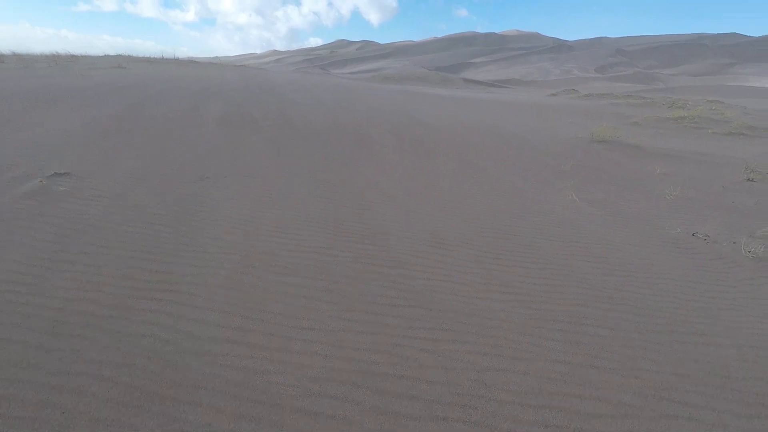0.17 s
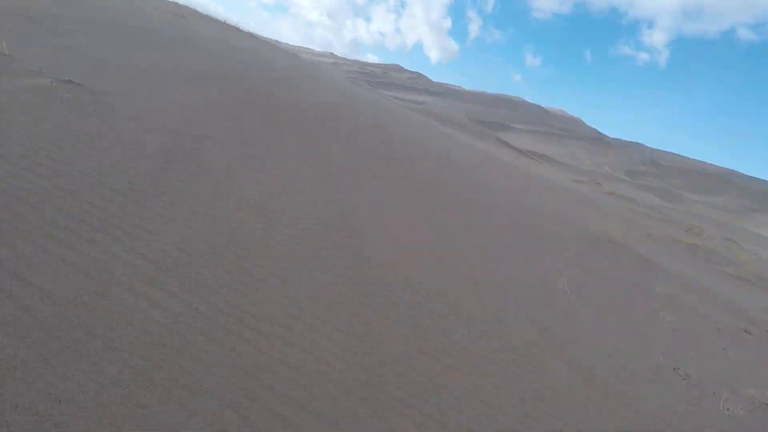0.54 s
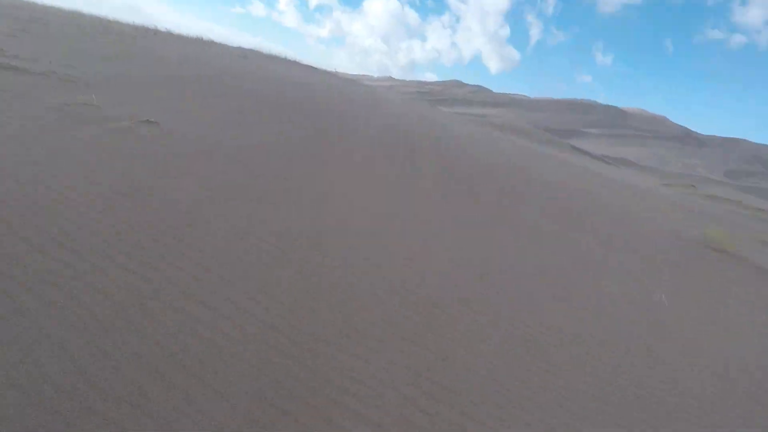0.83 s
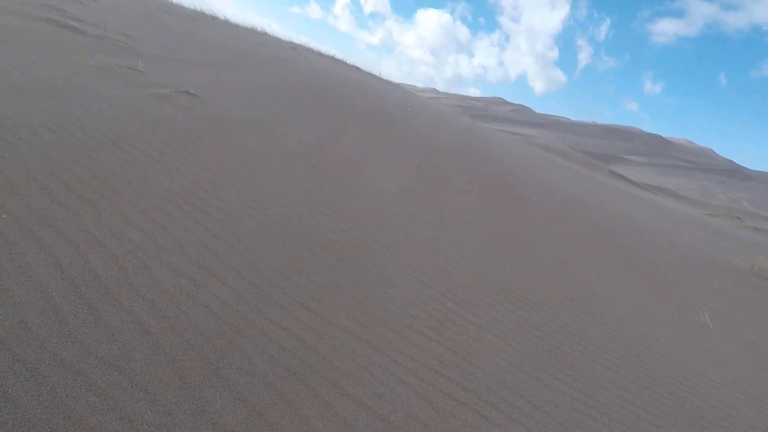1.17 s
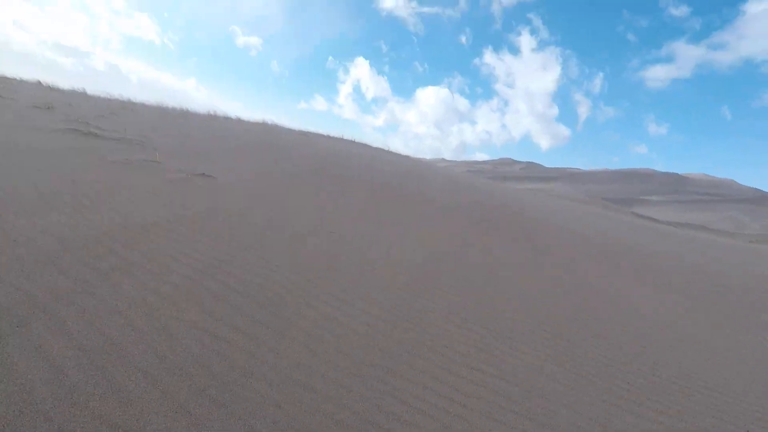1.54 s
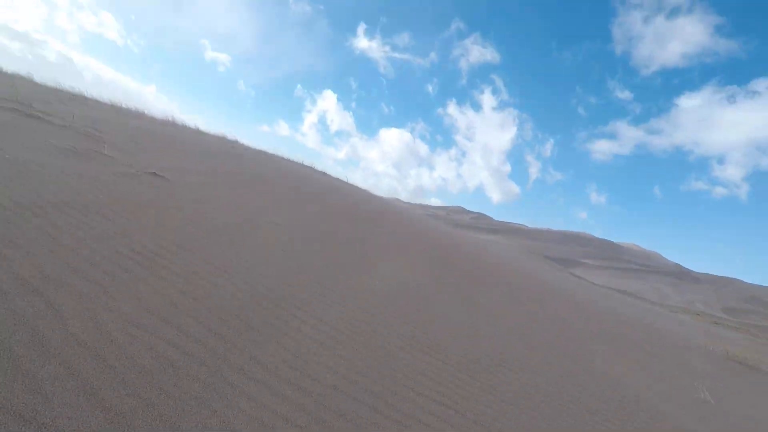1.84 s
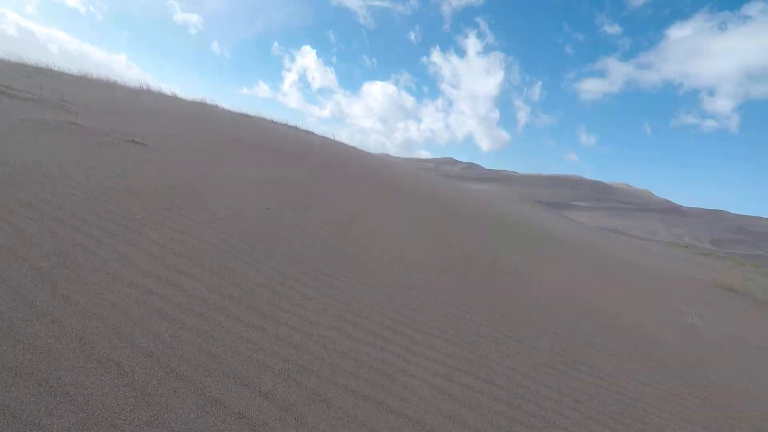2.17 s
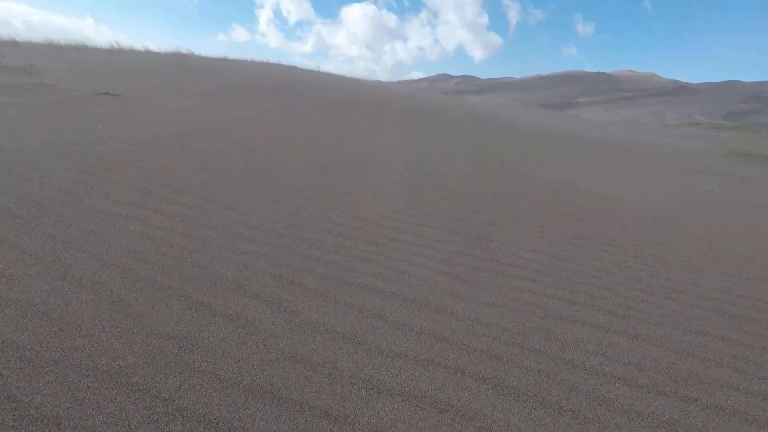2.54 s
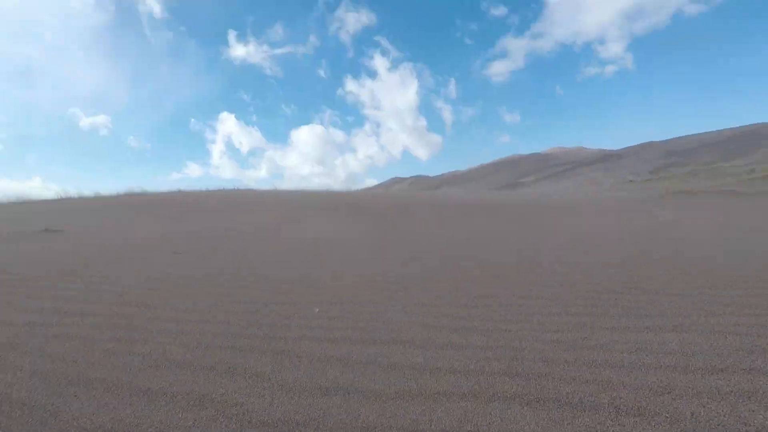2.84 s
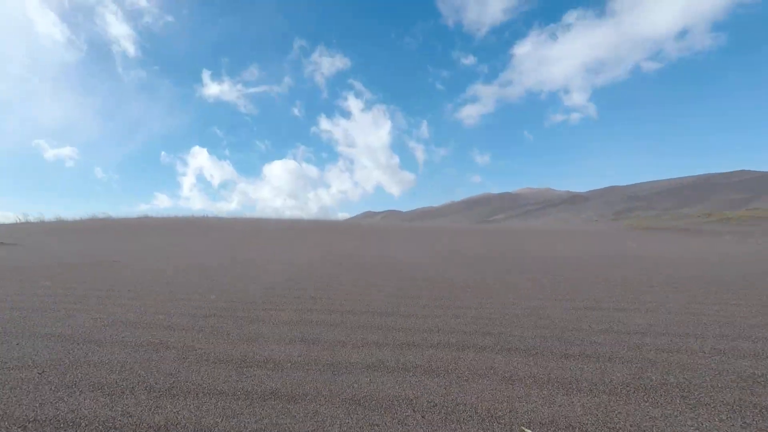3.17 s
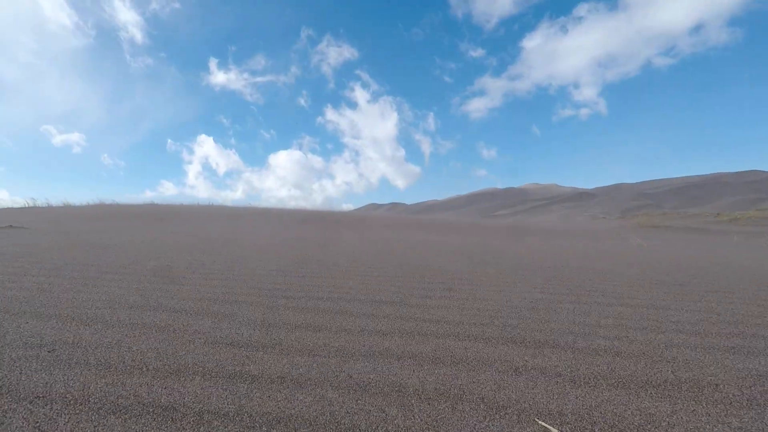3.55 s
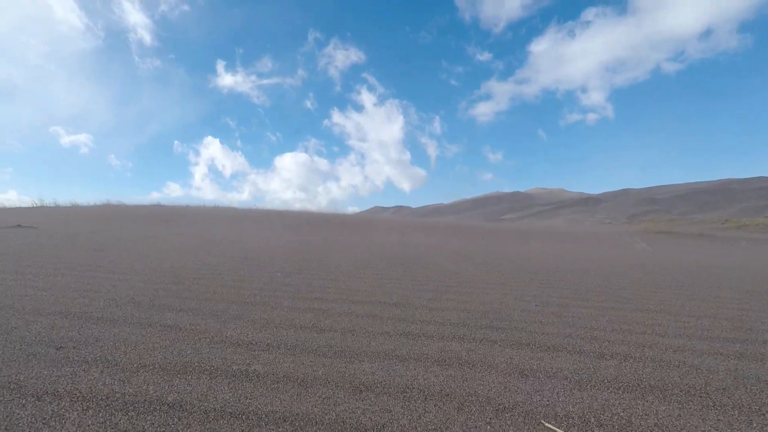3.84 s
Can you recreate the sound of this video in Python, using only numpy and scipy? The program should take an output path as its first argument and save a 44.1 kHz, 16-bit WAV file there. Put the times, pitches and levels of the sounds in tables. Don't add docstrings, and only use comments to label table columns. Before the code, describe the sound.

Gusty wind thumps and rumbles against a small camera microphone, swelling from near silence to a roar.

```python
import sys
import numpy as np
from scipy import signal
from scipy.io import wavfile
from scipy.ndimage import uniform_filter1d

SR = 44100
rng = np.random.default_rng(int(sys.argv[2]) if len(sys.argv) > 2 else 0)


def master_out(mix):
    frames = np.transpose(np.atleast_2d(mix))
    ceiling = np.clip(frames, -1, 1)
    pcm = np.round(ceiling * 32767).astype(np.int16)
    wavfile.write(sys.argv[1], SR, pcm)


def magnitude_from_level(level_db):
    exponent = np.asarray(level_db, float) / 20
    return 10 ** exponent


N = 176400

# start_s, length_s, level_db, pitch_hz
EDDIES = [(0.374, 0.029, -43.5, 66), (0.462, 0.06, -48.5, 166), (0.63, 0.03, -50.5, 69),
          (0.737, 0.02, -53, 88), (0.882, 0.0064, -33, 123), (0.915, .015, -42.5, 58.4),
          (2.388, 0.0097, -18.5, 281), (1.031, 0.013, -49, 92), (1.195, 0.0032, -39, 122),
          (1.239, 0.0061, -22.5, 186), (1.265, 0.0027, -13.5, 152), (1.351, 0.029, -24.5, 81.4),
          (1.376, 0.022, -21.5, 142), (1.413, 0.03, -31, 90), (1.457, 0.018, -18, 98),
          (1.538, 0.076, -30, 129), (1.741, 0.033, -24.5, 122), (1.781, 0.013, -15.5, 97),
          (1.852, 0.034, -15, 72.4), (1.927, 0.037, -15.5, 128.5), (2.052, 0.042, -24.5, 101),
          (2.119, 0.05, -20.5, 83), (2.391, 0.037, -13.5, 52.4), (2.506, 0.022, -19.5, 149),
          (2.566, 0.046, -16.5, 127), (2.608, 0.055, -15, 103), (2.669, 0.0113, -9.5, 85.6),
          (3.062, 0.018, -13.5, 82.4), (3.065, 0.0092, -17, 275), (3.078, 0.026, -18.5, 102.5),
          (3.12, 0.15, -34, 131), (2.683, 0.023, -30.5, 133), (2.783, .2, -41.5, 110),
          (3.119, 0.033, -30, 290), (3.248, 0.05, -32, 261), (2.184, 0.092, -41, 290),
          (2.334, 0.13, -43, 302), (1.58, 0.076, -45, 310), (3.634, 0.047, -34.5, 108),
          (3.704, 0.0062, -15.5, 119), (3.83, 0.18, -23.5, 132)]
# start_s, peak_db
EDDY_SNAPS = [
    (1.243, -15),
    (1.268, -11),
    (1.383, -14.5),
    (1.933, -24),
    (2.147, -28),
    (2.402, -5.5),
    (2.647, -22),
    (2.669, -16.5),
    (3.056, -6.5),
    (3.709, -32),
]
# start_s, length_s, level_db, edge_tone_hz
AIR_BURSTS = [(0.454, 0.047, -58, 485), (0.442, .095, -64.5, 4150), (0.772, 0.005, -60, 800),
              (0.874, 0.0053, -41, 950), (0.995, 0.095, -63.5, 1720), (1.107, 0.21, -59, 1670),
              (1.202, 0.0051, -57, 1600), (1.24, 0.0042, -28.5, 1600), (1.265, 0.009, -28.5, 770),
              (1.317, 0.071, -46, 1100), (1.379, 0.0068, -31, 1320), (1.389, 0.047, -45.5, 780),
              (1.458, 0.0056, -38.5, 800), (1.57, 0.0096, -42, 760), (1.544, 0.26, -54, 830),
              (1.852, 0.025, -37, 850), (1.887, .012, -34.5, 1600), (1.909, 0.016, -38, 1200),
              (1.932, 0.024, -26.5, 853), (2.045, 0.05, -34.5, 910), (2.057, 0.0083, -31, 1010),
              (2.142, 0.034, -32.5, 1005), (2.243, 0.018, -43, 4440), (2.186, 0.078, -32.5, 904),
              (2.308, 0.05, -41, 840), (2.394, 0.017, -31.5, 1590), (2.43, 0.0091, -38.5, 1600),
              (2.505, 0.027, -29.5, 1010), (2.563, 0.068, -42, 1860), (2.584, 0.051, -28, 1020),
              (2.642, 0.012, -22.5, 1570), (2.664, 0.011, -23, 950), (3.052, 0.022, -15, 1315),
              (3.076, 0.011, -13, 1590), (3.097, 0.0055, -17, 1560), (3.265, 0.0037, -23, 1170),
              (3.276, 0.0034, -20, 1100), (3.406, 0.0041, -27, 1250), (3.081, 0.21, -25, 1193),
              (3.091, .2, -26, 1574), (1.242, .006, -43, 2920), (1.266, 0.0045, -44.5, 2600),
              (3.348, 0.13, -37, 1080), (3.704, 0.0038, -18.5, 1400), (3.773, 0.41, -26, 1370),
              (3.825, 0.17, -27, 1580), (3.889, 0.078, -18, 1170)]
# time_s, level_db
AIR_STREAM = [(.09, -67), (.3, -66.5), (.55, -62), (.85, -61), (.96, -66.5), (1.15, -66), (1.3, -50.5),
              (1.5, -50.5), (1.75, -42), (1.83, -55), (2.0, -43), (2.29, -45.5), (2.6, -35.5), (2.71, -52),
              (3.0, -45.5), (3.35, -46), (3.6, -41.5), (4, -25.5)]
# time_s, depth_db
AIR_LULLS = [
    (.145, -7),
    (.32, -9),
    (.415, -7.5),
    (.725, -12),
    (1.51, -4.5),
    (2.015, -7),
    (2.115, -3),
    (2.29, -9),
    (2.469, -5.5),
]
# pitch_hz, width_hz, level_db
HOUSING_RINGS = [(550, 633, -6.5), (800, 410, -0.5), (1100, 110, -0.5), (1482, 270, -5), (1972, 252, -6),
                 (2533, 175, -7), (3517, 287, -14), (4530, 620, -17), (5845, 554, -17.5), (6860, 640, -30),
                 (8600, 1000, -34.5), (11000, 4500, -51)]
# time_s, level_db, grains_per_s
SAND_STREAM = [(0, -125, 6000), (1.2, -108, 5400), (1.7, -77.5, 3900), (2.5, -67, 3000), (2.74, -63.5, 550),
               (2.8, -60, 580), (2.93, -65, 980), (2.97, -54, 3400), (3.3, -51, 3200), (3.6, -53, 970),
               (4, -59, 7200)]
# time_s, peak_db
COARSE_GRAINS = [(1.002, -53), (1.135, -56), (1.1737, -50), (1.1894, -63), (1.2023, -58), (1.2113, -56),
                 (1.5585, -60), (1.8035, -61), (1.8603, -41), (2.1567, -42), (2.235, -45), (2.2474, -29),
                 (2.3854, -35), (2.63, -36), (2.6889, -38), (2.7591, -35), (2.7826, -32.5), (2.7864, -56),
                 (2.7984, -58), (2.804, -29), (2.8165, -38), (2.8516, -34), (2.8804, -27.5), (2.9364, -38),
                 (2.9663, -33), (3.2053, -26), (3.2332, -28), (3.4662, -38), (3.5041, -47), (3.6368, -38),
                 (3.6642, -29), (3.6907, -32), (3.7081, -20), (3.745, -26.5), (3.7889, -23)]
# pitch_hz, width_hz, level_db
CASE_RINGS = [
    (1600, 230, 8),
    (2510, 190, 7),
    (3500, 780, 1.5),
    (4505, 230, 8.5),
    (5660, 480, 6),
    (6840, 750, 1),
    (8500, 1100, -1.5),
    (10150, 1900, -16.5),
]
# time_s, rumble_db, flutter_db
STEADY_WIND = [(0, -50, -63), (.38, -45, -61.5), (.8, -47, -66.5), (1.2, -44.5, -56.5), (1.3, -34, -40),
               (1.7, -31, -52.5), (2.0, -30.5, -42.5), (2.3, -26, -43), (2.7, -22.5, -46),
               (2.8, -23.5, -49), (3.03, -20, -44.5), (3.35, -28.5, -38), (3.55, -28.5, -43),
               (3.75, -20, -34), (4, -13.5, -13.5)]
# time_s, ceiling_hz
TREBLE_CEILING = [(0, 9500), (.44, 9900), (.5, 11500), (.58, 10600), (1.0, 12700), (1.35, 13000),
                  (1.55, 14300), (2.0, 15300), (2.7, 15600), (2.9, 16500), (4, 16500)]


def unit_rms(x):
    return x / np.sqrt(np.mean(x ** 2) + 1e-20)


def in_time(rows):
    times_s, *columns = np.transpose(rows)
    return [np.interp(np.arange(N) / SR, times_s, column) for column in columns]


def drift(rate_hz):
    r = np.exp(-40 * np.pi * rate_hz / SR)
    white = rng.standard_normal(N // 20 + 2002)
    slow = signal.lfilter([1], [1, -2 * r, r * r], white)[2000:]
    return np.interp(np.arange(N) / 20, np.arange(len(slow)), unit_rms(slow))


def resonate(x, hz, width_hz):
    r = np.exp(-np.pi * width_hz / SR)
    ringing = [1, -2 * r * np.cos(2 * np.pi * hz / SR), r * r]
    return signal.lfilter([(1 - r * r) / 2, 0, (r * r - 1) / 2], ringing, x)


def body(x, rings, patchy_db):
    out = 0
    for k, (hz, width_hz, db) in enumerate(rings):
        flicker = magnitude_from_level(db + patchy_db * drift(14.3))
        out = out + (-1) ** k * flicker * resonate(x, hz, width_hz)
    return out


def cut(x, hz, kind, order):
    return signal.sosfilt(signal.butter(order, hz, kind, fs=SR, output="sos"), x)


def burst(start_s, length_s, attack_s, release_s):
    t = np.arange(N) / SR - start_s
    slower_s = 0.17 * np.clip(length_s - 0.04, 0, 0.1)
    rise = np.clip(t / (attack_s + slower_s), 0, 1) ** 2
    return rise * np.exp(-np.clip(t - length_s, 0, None) / (release_s + slower_s))


def ticks(rows, gain_db, t60_s):
    out = np.zeros(N)
    times_s, db = np.transpose(rows)
    out[(times_s * SR).astype(int)] = magnitude_from_level(db + gain_db)
    return signal.lfilter([1], [1, -magnitude_from_level(-60 / (t60_s * SR))], out)


def buffets():
    overtone_db, push_db = -17.5, -2
    out = np.zeros(N)
    white = rng.standard_normal((3, N))
    for start_s, length_s, db, hz in EDDIES:
        a = int((start_s - 0.1) * SR)
        b = min(N, int((start_s + length_s + 0.1) * SR))
        swing = signal.hilbert(cut(resonate(white[0, a:b], hz, 0.51 * hz), 1.76 * hz, "low", order=2))
        size = np.abs(swing)
        swing = swing.real / (size + 0.46 * size.mean())
        overtone = unit_rms(cut(resonate(white[1, a:b], 1.82 * hz, hz), 298, "low", order=3))
        push = unit_rms(cut(resonate(white[2, a:b], 0.36 * hz, 0.36 * hz), hz, "low", order=2))
        shape = burst(start_s, length_s, attack_s=0.0036, release_s=0.0062)[a:b]
        thump = shape * (1.65 * swing + magnitude_from_level(overtone_db) * overtone + magnitude_from_level(push_db) * push)
        out[a:b] += magnitude_from_level(db) * cut(thump, 634, "low", order=2)
    return out


def snaps():
    snap_db, pop_db = 1.5, 13.5
    pop_hz, pop_width_hz = 284, 118
    push = ticks(EDDY_SNAPS, snap_db, t60_s=0.0067)
    crack = body(push * rng.standard_normal(N), HOUSING_RINGS, patchy_db=-8.0)
    crack = cut(crack, 3100, "low", order=2)
    pop = resonate(push, pop_hz, pop_width_hz)
    pop = resonate(pop, pop_hz, 1.6 * pop_width_hz)
    return crack + magnitude_from_level(pop_db - snap_db) * cut(pop, 466, "low", order=2)


def air_rushes(stream_white, edge_white):
    edge_db, edge_width, swing_db = 5, 0.23, 1.5
    bright_hz_per_s = 540000
    out = np.zeros(N)
    gusty = unit_rms(body(stream_white, HOUSING_RINGS, patchy_db=2.5)) * magnitude_from_level(swing_db * drift(45.6))
    for start_s, length_s, db, hz in AIR_BURSTS:
        a = int((start_s - 0.05) * SR)
        b = min(N, int((start_s + length_s + 0.12) * SR))
        edge = resonate(edge_white[a:b], hz, edge_width * hz)
        edge = unit_rms(resonate(edge, hz, 2 * edge_width * hz))
        shape = burst(start_s, length_s, attack_s=0.0014, release_s=0.004)[a:b]
        air = shape * (cut(gusty[a:b], 0.49 * hz, "high", order=3) + magnitude_from_level(edge_db) * edge)
        bright_hz = np.clip(bright_hz_per_s * length_s, 2 * hz, 0.4 * SR)
        air = unit_rms(cut(air, bright_hz, "low", order=2))
        out[a:b] += magnitude_from_level(db) * air * np.sqrt(np.mean(shape ** 2))
    return out


def airflow():
    lull_s, hiss_db, hiss_follows = 0.017, -77, 0.87
    db, = in_time(AIR_STREAM)
    t = np.arange(N) / SR
    for time_s, depth_db in AIR_LULLS:
        db = db + depth_db * np.exp(-((t - time_s) / lull_s) ** 2)
    white = rng.standard_normal((3, N))
    white[1:] *= magnitude_from_level(1 * drift(340))
    stream = unit_rms(body(white[0], HOUSING_RINGS, patchy_db=1.6)) * magnitude_from_level(db + 2.2 * drift(11))
    air = cut(stream + air_rushes(white[1], white[2]), 12300, "low", order=4)
    hiss = unit_rms(cut(cut(white[0], 6500, "high", order=3), 9100, "low", order=2))
    hiss = hiss[::-1]
    steady_db = uniform_filter1d(db, size=SR // 12)
    return air + hiss * magnitude_from_level(hiss_db + hiss_follows * (steady_db - db.mean()))


def sand():
    spread_db, hiss_db, case_db = 4.5, -4, 12
    top_db, top_follows = 4.5, 0.3
    db, rate = in_time(SAND_STREAM)
    hit = rng.random(N) < rate * magnitude_from_level(4 * drift(25)) / SR
    sizes = hit * magnitude_from_level(spread_db * np.minimum(rng.exponential(1, N), 4)) / np.sqrt(rate)
    puffs = np.sqrt(signal.lfilter([1], [1, -0.93], sizes ** 2))
    puffs = magnitude_from_level(db) * (puffs / np.sqrt(np.mean(puffs ** 2)) + magnitude_from_level(hiss_db))
    puffs = puffs + ticks(COARSE_GRAINS, gain_db=-10, t60_s=0.006)
    strikes = puffs * rng.standard_normal((3, N))
    case = body(strikes[0], CASE_RINGS, patchy_db=1.1)
    case = case - 0.65 * resonate(case, 11400, 800)
    bright = cut(strikes[1:], 11900, "high", order=8)
    top = resonate(bright, 12300, 1000) + magnitude_from_level(-1) * bright
    return magnitude_from_level(case_db) * case + top * magnitude_from_level(top_db + top_follows * (db - db.max()))


def rumble():
    rumble_hz, flutter_hz = 27, 150
    db, flutter_db = in_time(STEADY_WIND)
    white = rng.standard_normal((2, N + SR))
    deep = cut(cut(white[0], rumble_hz, "low", order=3), 3.8, "high", order=1)
    deep = deep / np.sqrt(uniform_filter1d(deep ** 2, size=6000))
    deep = unit_rms(deep[SR:])
    flutter = resonate(white[1], 0.35 * flutter_hz, flutter_hz)
    flutter = unit_rms(cut(flutter, 2.85 * flutter_hz, "low", order=3)[SR:])
    deep = magnitude_from_level(db + 0.26 * drift(1.9)) * deep
    return deep + flutter * magnitude_from_level(flutter_db + 2.0 * drift(1.6))


def scene():
    opens_s, hum_db, hum_hz = 0.088, -76, 19
    t = np.arange(N) / SR
    wind = buffets() + snaps() + airflow() + sand() + rumble()
    opening = np.clip((t - opens_s) / 0.0085, 0, 1)
    hum = magnitude_from_level(hum_db) * np.sin(2 * np.pi * hum_hz * t + 1) * (t < opens_s)
    return wind * opening + hum


def ceiling(x):
    waver_hz, above_db = 900, -30
    hz, s, frames = signal.stft(x, SR, nperseg=1024)
    waver = rng.standard_normal((len(hz) // 16 + 1, len(s) // 3 + 1))
    waver = waver.repeat(16, axis=0).repeat(3, axis=1)[:len(hz), :len(s)]
    edge_hz = np.interp(s, *np.transpose(TREBLE_CEILING))
    edge_hz = edge_hz + waver_hz * waver * np.clip(3 * s - 3.3, 0.12, 1)
    gain = np.where(hz[:, None] > edge_hz, magnitude_from_level(above_db), 1)
    return signal.istft(frames * gain, SR, nperseg=1024)[1][:, :N]


def band_limit(x):
    return signal.sosfilt(signal.butter(12, 15400, fs=SR, output="sos"), x)


def record(dry):
    rounded = 1.332 * np.tanh(dry / 1.312)
    top_edge = signal.ellip(12, 0.5, 70, 15330, fs=SR, output="sos")
    mix = signal.sosfilt(top_edge, ceiling(rounded))
    return band_limit(mix)


dry = scene()
out = record(dry)
master_out(out)
```